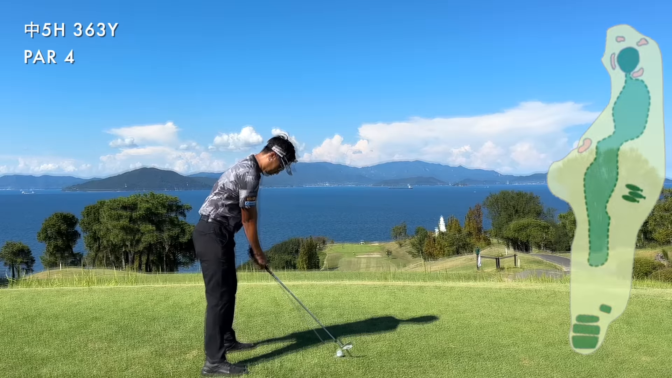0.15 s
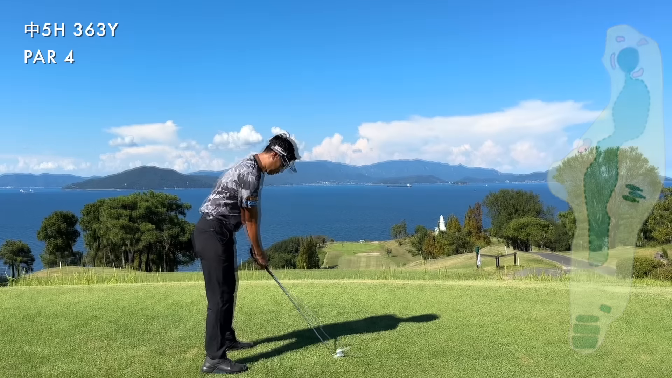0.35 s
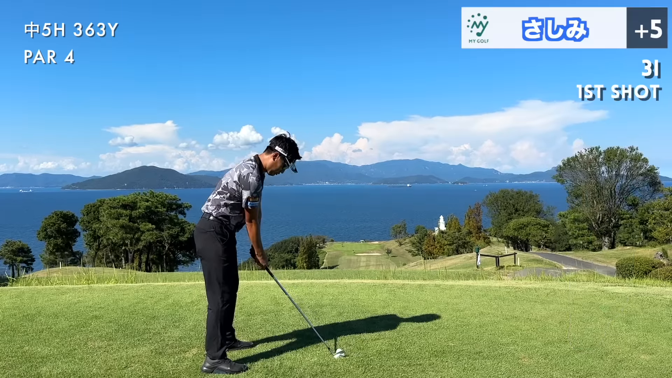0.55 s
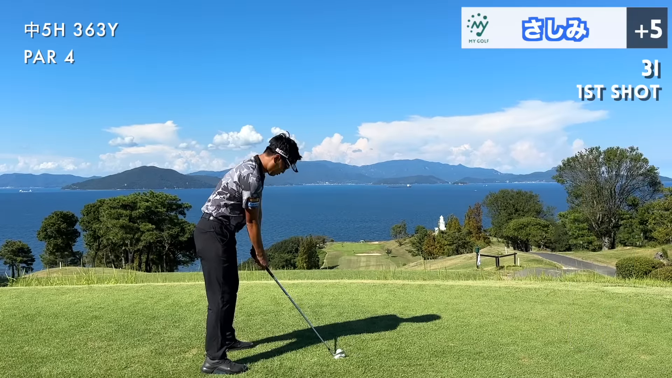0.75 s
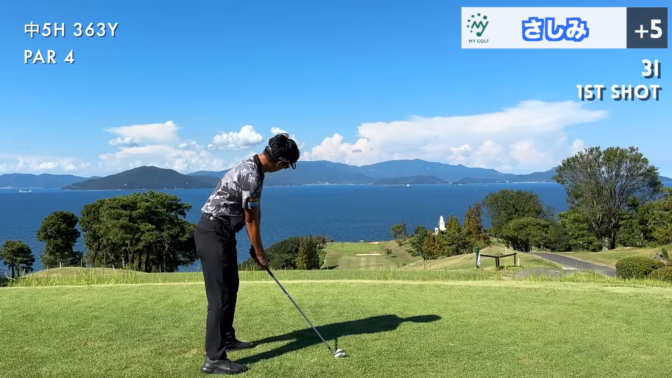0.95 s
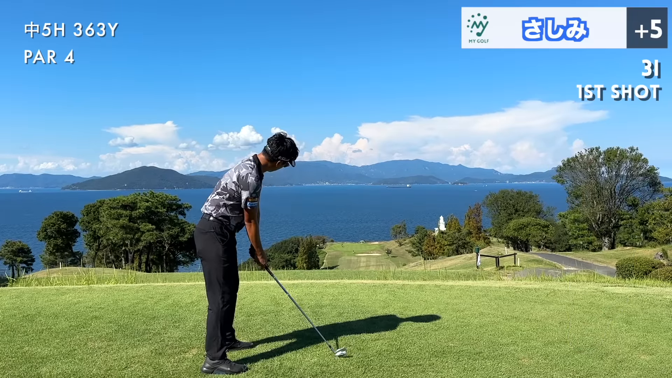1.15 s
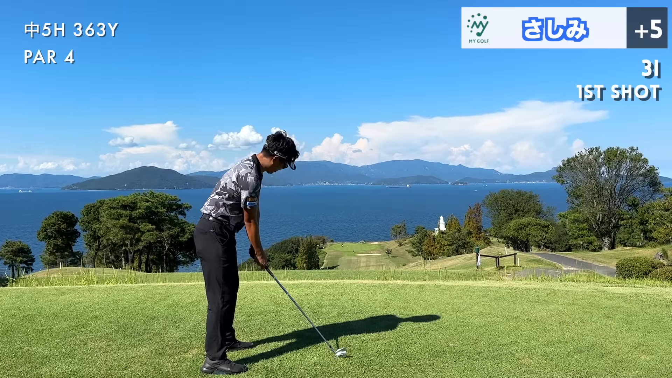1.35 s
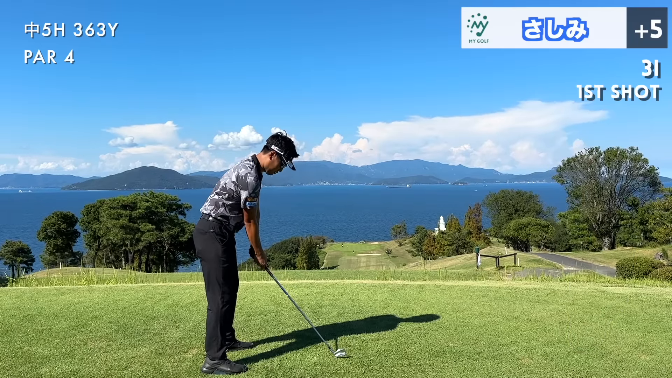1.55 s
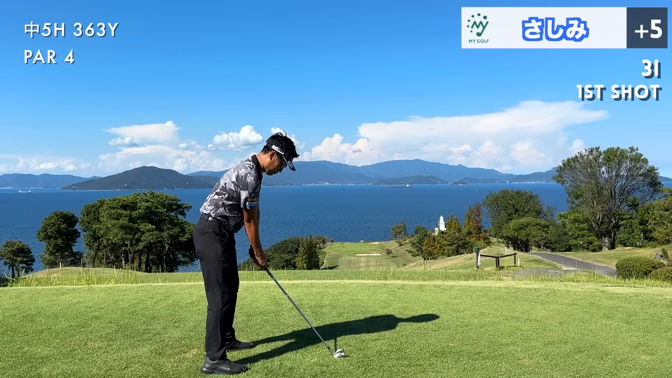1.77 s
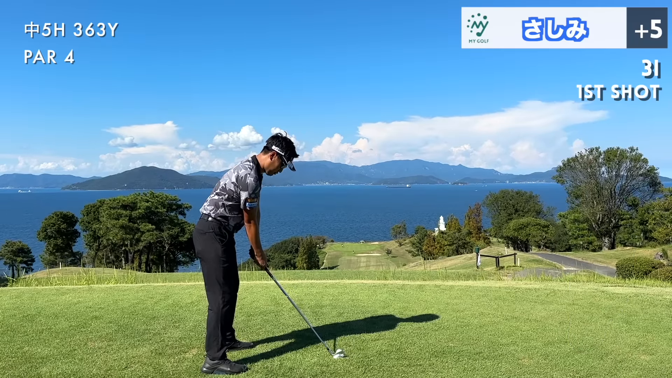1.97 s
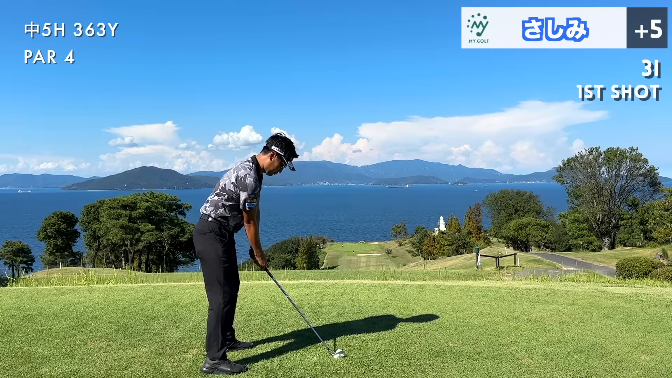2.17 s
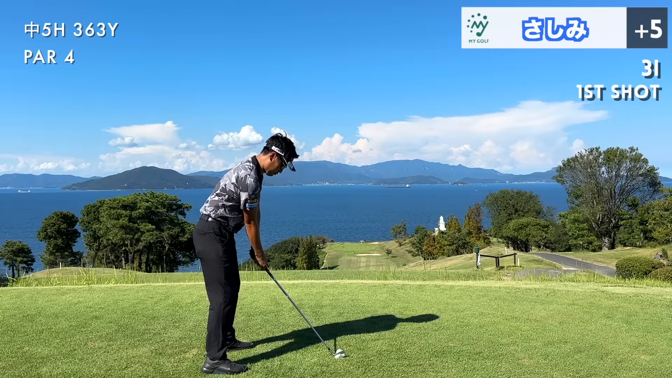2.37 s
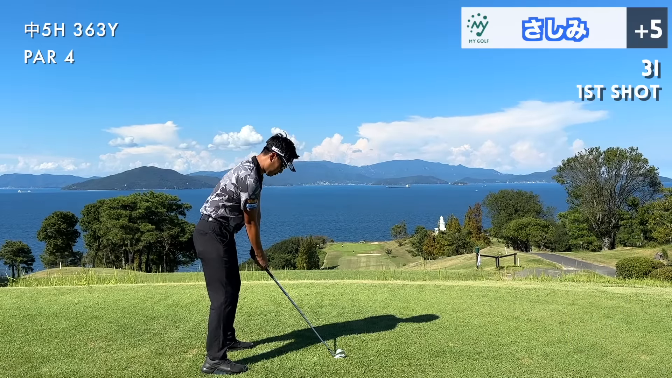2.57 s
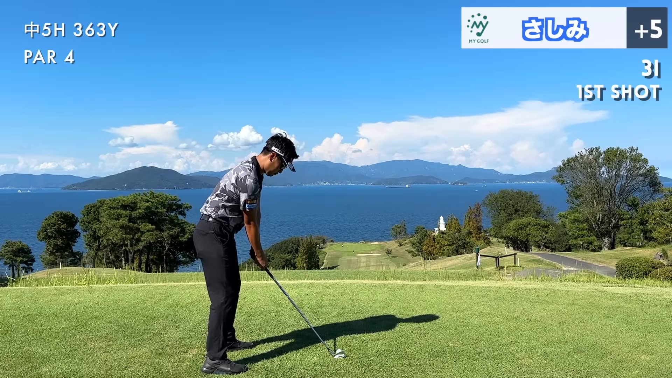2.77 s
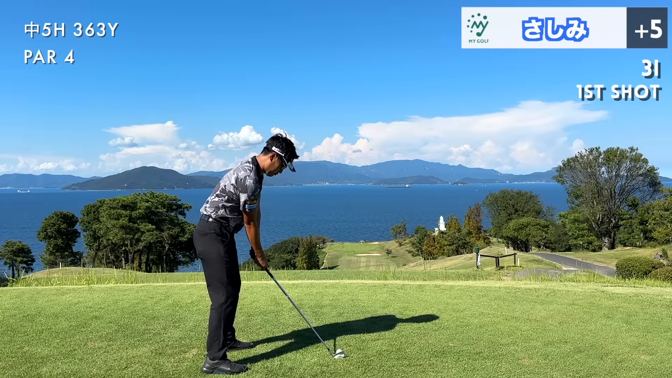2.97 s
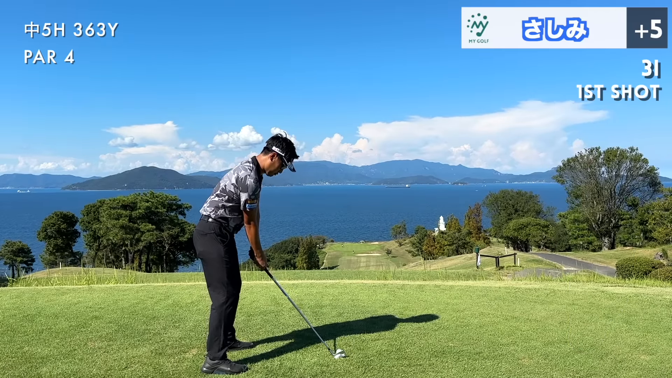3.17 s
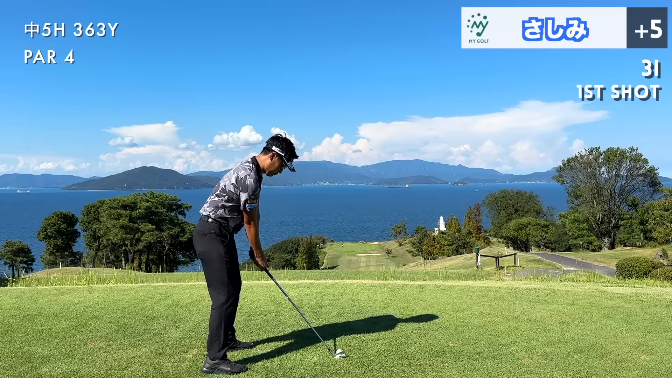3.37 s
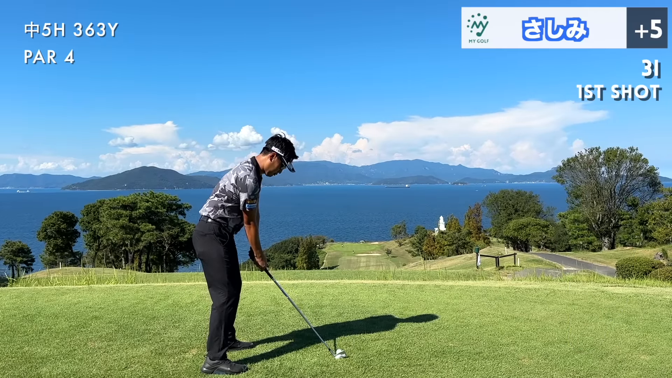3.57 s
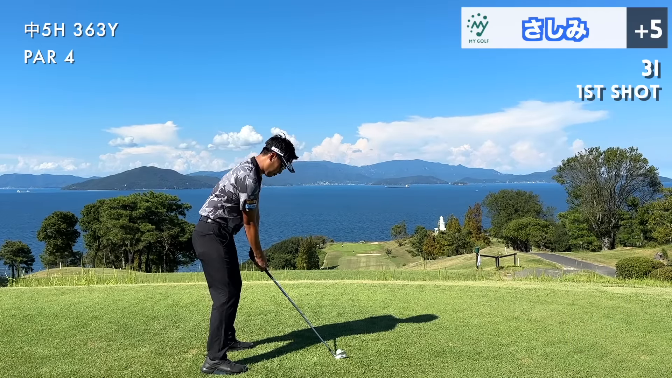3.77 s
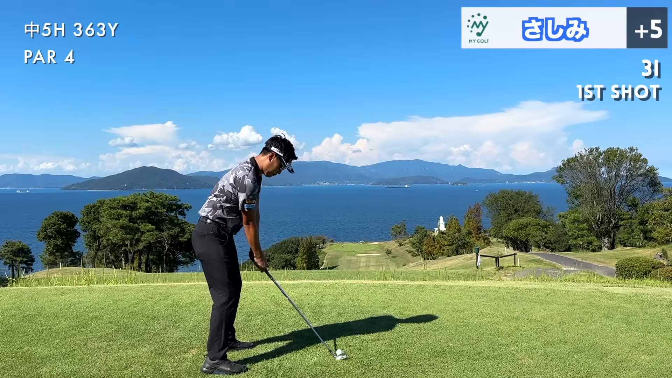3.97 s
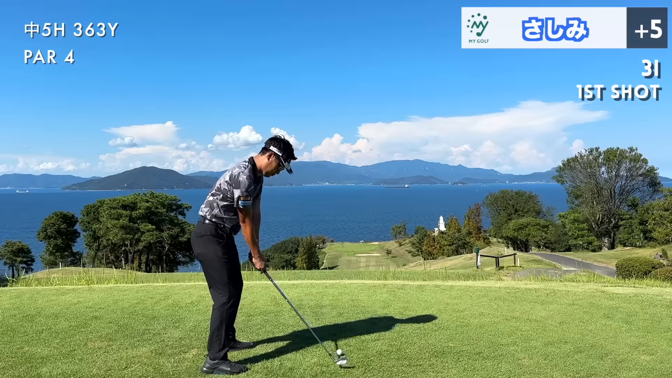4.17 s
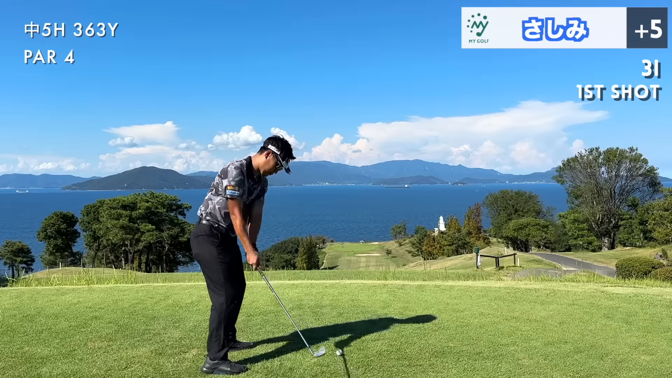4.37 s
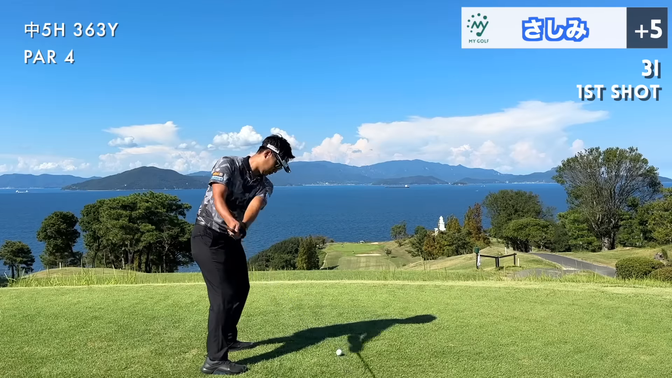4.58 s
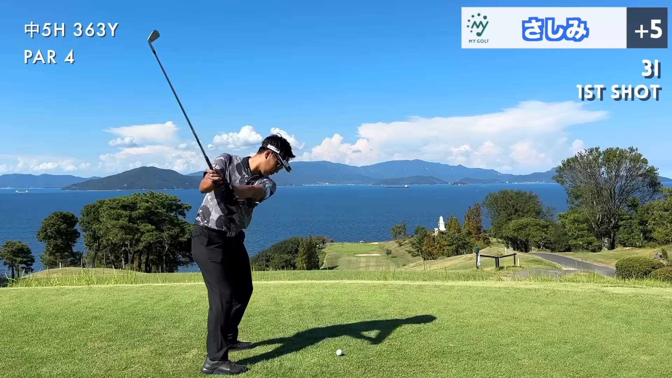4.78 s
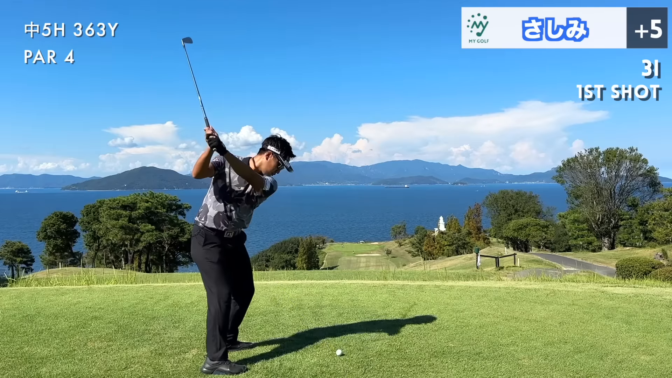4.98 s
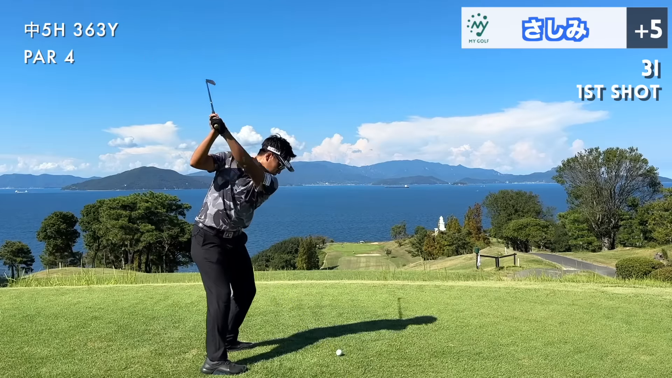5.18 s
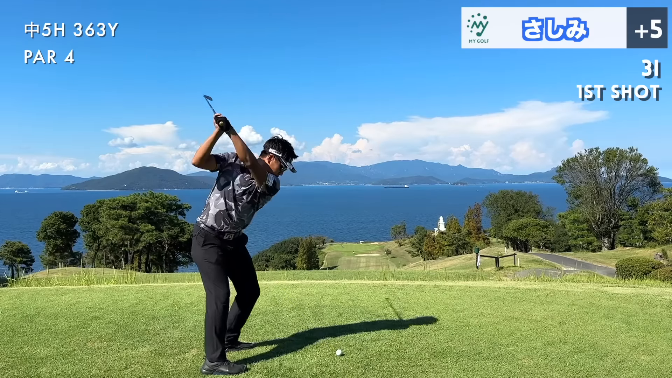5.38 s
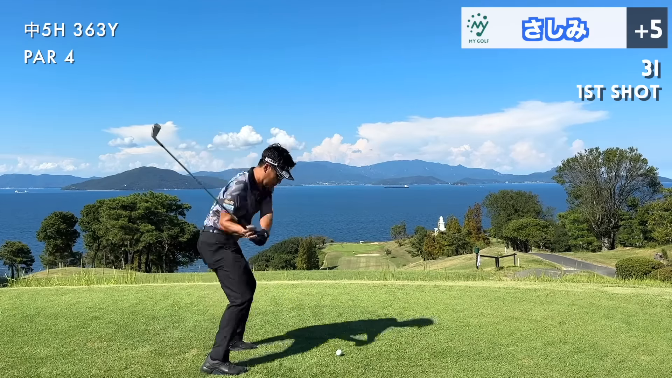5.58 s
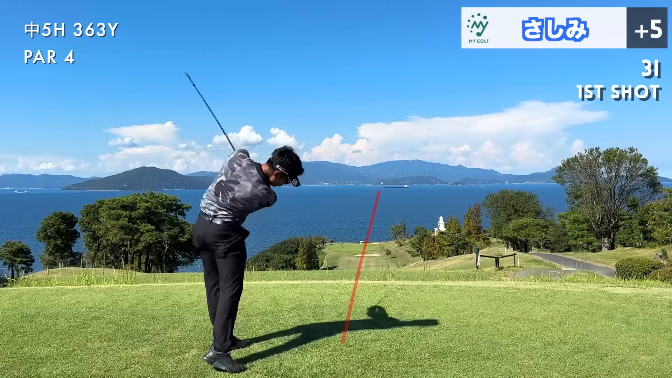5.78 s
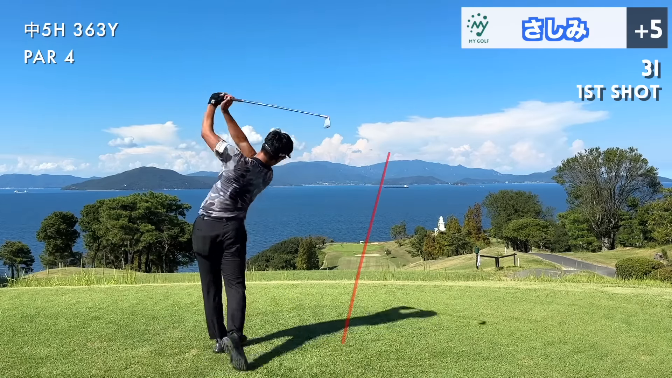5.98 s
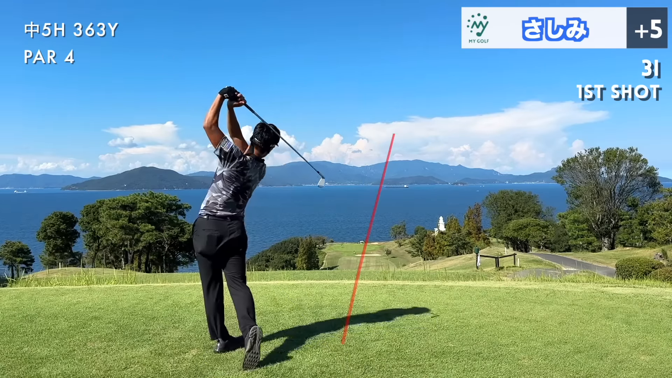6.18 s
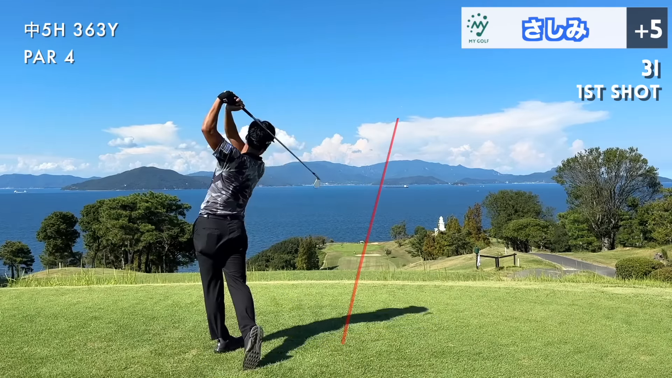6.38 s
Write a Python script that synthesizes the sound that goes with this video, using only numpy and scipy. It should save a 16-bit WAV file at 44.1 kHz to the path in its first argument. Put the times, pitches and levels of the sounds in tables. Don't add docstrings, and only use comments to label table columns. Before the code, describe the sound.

For the first four seconds an open seaside tee is quiet except for wind pushing unevenly on the microphone: deep rumble, flutters, short lulls and dull slaps, notably near 1.4 and 1.8 s. Behind it lies a soft steady hiss of sea and leaves with a barely audible motor hum. A cricket gives faint, high, short chirps about every 0.3 s from 0.5 to 4.9 s. Tiny ticks occur, a brighter one at 3.9 s. From about 4.4 s clothing rustles lightly with the backswing, then surges near 5.5 s. A narrow airy whistle sweeps upward from 5.6 s into a very loud, dry, slightly clipped crack of iron on ball at 5.7 s, gone within hundredths of a second. A tiny tee rattle follows immediately, then soft cloth and shoe scuffs around 5.9 s and beyond, under continuing gusts until 6.4 s.

```python
import sys
import numpy as np
from scipy import signal
from scipy.io import wavfile

SR = 44100
rng = np.random.default_rng(int(sys.argv[2]) if len(sys.argv) > 2 else 0)


def to_linear_factor(level_db):
    exponent = np.asarray(level_db, float) / 20
    return 10 ** exponent


def transcribe(u):
    v = np.clip(np.atleast_2d(u).T, -1, 1)
    q = np.round(v * 32767).astype(np.int16)
    wavfile.write(sys.argv[1], SR, q)


N = 283783


def rms_one(x):
    return x / np.sqrt(np.mean(x ** 2) + 1e-20)


def in_time(rows, outside=-120.):
    s, *columns = np.transpose(rows)
    return [np.interp(np.arange(N) / SR, s, column, outside, outside) for column in columns]


def at_hz(points, hz):
    points_hz, points_db = np.transpose(points)
    return np.interp(np.log(hz), np.log(points_hz), points_db)


def drift(rate):
    r = np.exp(-80 * np.pi * rate / SR)
    slow = signal.lfilter([1], [1, -2 * r, r * r], rng.standard_normal(N // 40 + 2002))[2000:]
    return np.interp(np.arange(N) / 40, np.arange(len(slow)), rms_one(slow))


def ring(x, hz, t60):
    r, w = to_linear_factor(-60 / (t60 * SR)), 2 * np.pi * hz / SR
    return signal.lfilter([0, np.sin(w)], [1, -2 * r * np.cos(w), r * r], x + 1e-18)


def band_pass(x, low_hz, high_hz):
    return signal.sosfilt(signal.butter(2, [low_hz, high_hz], "band", fs=SR, output="sos"), x)


def bands(spectrum, source):
    lowest, highest = spectrum[0][0], spectrum[-1][0]
    edges = lowest * 2 ** np.arange(0, np.log2(highest / lowest) + .5, .5)
    edges = np.minimum(edges, 19000)
    hz = np.sqrt(edges[1:] * edges[:-1])
    parts = []
    for k, centre in enumerate(hz):
        band = band_pass(source[k % 2], edges[k], edges[k + 1])
        parts.append(to_linear_factor(at_hz(spectrum, centre)) * band)
    return zip(hz, np.array(parts) / np.std(sum(parts)))


def swell(curves_db, centres_hz, hz):
    place = np.interp(np.log(hz), np.log(centres_hz), np.arange(len(centres_hz)))
    low = min(int(place), len(centres_hz) - 2)
    return curves_db[low] + (place - low) * (curves_db[low + 1] - curves_db[low])


def air():
    # (frequency [Hz], level [dB/Hz])
    hiss_spectrum = [(180, -34), (300, -3), (978, 4.5), (1080, -0.5), (1460, -3), (1610, -5.5),
                     (5700, -17.5), (7080, -16.5), (7690, -16.5), (16000, -19.5)]
    # (frequency [Hz], width [Hz], level [dB])
    motor_lines = [
        (123, 8, -58),
        (1500, 30, -87),
    ]
    # (time [s], length [s], frequency [Hz], level [dB])
    far_insects = [
        (.6, .3, 11500, -89),
        (.18, .13, 4600, -85),
        (.1, .24, 1500, -74),
        (5.3, .3, 1500, -68),
        (3.8, 1.0, 1500, -83),
    ]
    hiss = to_linear_factor(-70.5) * sum(band * to_linear_factor(.6 * drift(3))
                            for hz, band in bands(hiss_spectrum, rng.standard_normal((2, N))))
    for hz, width_hz, db in motor_lines:
        line = rms_one(ring(rng.standard_normal(N), hz, 2.5 / width_hz))
        hiss += to_linear_factor(db + 5.1 * drift(3.7)) * line
    white = rng.standard_normal(N)
    for s, length, hz, db in far_insects:
        shape = np.exp(-((np.arange(N) / SR - s) / (.5 * length)) ** 4)
        hiss += to_linear_factor(db) * shape * rms_one(ring(white, hz, 420.0 / hz))
    return hiss


def wind(level_db=-37, lumpy_db=1.5, reach_octaves=1.5):
    # (time [s], level [dB])
    gusts = [(0.0, -1.5), (0.56, -7.5), (0.64, 0.5), (0.7, -2), (1.84, 5.5), (2.0, -3.5), (2.46, 9.5),
             (2.8, -15), (3.18, 10), (3.66, -2.6), (4.14, 3.4), (4.28, 6.5), (4.52, -21.5), (4.68, -1.2),
             (5.24, 4), (6.04, -0.9), (6.1, -18), (6.43, 0.8)]
    gust_hz, gust_follow = (50, 200, 520), (.6, 1.0, 1)
    # (frequency [Hz], level [dB/Hz])
    buffet = [(8.8, -22), (15, 5), (54, 1.5), (93, -4.5), (136, -8.5), (168, -11), (276, -19.5),
              (609, -36.5), (677, -45.5), (2500, -82), (3250, -92), (5500, -120)]
    # (time [s], half length [s], swell [dB], pitch [Hz])
    passing_eddies = [(0.2, 0.13, -8.5, 30.3), (0.422, 0.03, -7, 30), (0.8, 0.08, 6.5, 30),
                      (1.095, 0.08, -7, 480), (1.293, 0.08, 5.5, 119), (1.599, 0.03, 10, 29.7),
                      (2.055, 0.05, -11, 480), (2.23, 0.05, 10, 480), (2.452, 0.05, -14, 30),
                      (3.397, 0.08, 3.5, 480), (3.435, 0.05, 9, 59.7), (3.69, 0.08, -2.5, 480),
                      (3.922, 0.05, 8.5, 60), (4.07, 0.08, -5.4, 58.4), (4.53, 0.05, 18, 480),
                      (4.87, 0.03, 6.5, 118), (5.053, 0.05, -12, 238), (5.235, 0.13, 3, 120),
                      (5.397, 0.05, -14, 243), (5.555, 0.05, 11.1, 238), (5.763, 0.05, -16, 120),
                      (5.881, 0.05, 12, 240), (6.289, 0.05, 14, 29.3), (6.3, 0.05, 7.5, 240),
                      (6.41, 0.05, -6.5, 30), (6.415, 0.03, -16, 240),
                      (0.075, .03, 7.5, 480),
        (1.443, 0.029, 4, 240),
        (1.83, 0.025, 3.5, 700),
        (2.62, .03, 7, 300),
        (4.672, 0.025, 10, 350),
        (5.145, 0.057, 5, 402),
        (5.313, 0.037, 3.5, 199),
        (5.69, .035, -10, 250.2),
    ]
    t, (gust_db,) = np.arange(N) / SR, in_time(gusts, outside=0)
    s, half, db, pitch = np.transpose(passing_eddies)[:, :, None]
    coarse_t = t[::64]
    eddies = db * np.exp(-((coarse_t - s) / half) ** 2)
    lurch, out = drift(25), 0
    for hz, band in bands(buffet, rng.standard_normal((2, N))):
        nearness = np.exp(-(np.log2(hz / pitch) / reach_octaves) ** 2)
        passing_db = np.interp(t, coarse_t, np.sum(eddies * nearness, axis=0))
        follow_db = swell(gust_follow, gust_hz, hz) * gust_db
        lurch_db = lumpy_db * min(hz / 250, 1) * lurch
        out = out + band * to_linear_factor(level_db + follow_db + passing_db + lurch_db)
    return out


def thumps(hz=200, length=0.0075, gain_db=6):
    # (time [s], peak level [dB])
    slaps = [
        (1.354, -36.5),
        (1.468, -42),
        (1.812, -31),
        (2.219, -42.5),
        (3.39, -39),
        (3.431, -37.5),
        (4.184, -44),
        (4.863, -35.5),
        (6.284, -37.5),
    ]
    t = np.arange(N) / SR
    shape = sum(to_linear_factor(db) * np.exp(-((t - s - length) / length) ** 2) for s, db in slaps)
    dull = signal.sosfilt(signal.butter(3, hz, fs=SR, output="sos"), rng.standard_normal(N))
    return to_linear_factor(gain_db) * shape * rms_one(dull)


def chirp_events(chirp_hz=7086, spread_db=0.5, spread_s=.008, spread_hz=50):
    # (time [s], peak level [dB])
    chirps = [(0.4738, -65.5), (0.7502, -63.5), (1.0266, -64.5), (1.3069, -64), (1.5893, -65),
              (1.8746, -63.5), (2.1645, -64), (2.4563, -63.5), (2.7501, -62.5), (3.0455, -61.5),
              (3.3453, -67), (3.6411, -64.5), (3.9449, -64.5), (4.2457, -62.5), (4.5594, -73),
              (4.8589, -66)]
    # (delay [s], level relative to -63 dB [dB], pitch [Hz], first chirp, last chirp)
    answers = [
        (-.125, -19, 6850, 0, 10),
        (.055, -15, 7040, 7, 13),
        (-.05, -20, 7000, 0, 6),
    ]
    rows = [(s, db, chirp_hz) for s, db in chirps]
    for delay, under_db, hz, first, last in answers:
        chance = rng.standard_normal((len(chirps), 3)) * [spread_s, spread_db, spread_hz]
        for k in range(first, last + 1):
            rows.append(np.add((chirps[k][0] + delay, -63 + under_db, hz), chance[k]))
    return rows


def cricket(length=.028, fall_hz=330, overtone_db=-18, echo_db=-13, lead=.008, chorus_db=-94):
    out, t = np.zeros(N), np.arange(int(length * SR)) / SR
    shape = np.sin(np.pi * (t / length) ** 0.89) ** 2
    for s, db, hz in chirp_events():
        turn = 2 * np.pi * np.cumsum(hz + fall_hz * (.5 - t / length)) / SR
        tone = np.sin(turn) + to_linear_factor(overtone_db) * np.sin(2 * turn)
        at = int((s - lead) * SR)
        out[at:at + len(t)] += to_linear_factor(db) * shape * tone
    out *= 1 + 0.29 * drift(150)
    scatter = rng.standard_normal(2000) * to_linear_factor(-60 * np.arange(2000) / SR / 0.036)
    blurred = signal.fftconvolve(out, scatter / np.linalg.norm(scatter))[:N]
    echo = np.roll(blurred, int(.015 * SR))
    chorus = rms_one(ring(rng.standard_normal(N), 6870, 0.01)) * to_linear_factor(3.9 * drift(25))
    chorus *= np.arange(N) < 4.4 * SR
    return out + to_linear_factor(echo_db) * echo + to_linear_factor(chorus_db) * chorus


def ticks():
    # (time [s], peak level [dB], pitch [Hz], dry click [dB], bright ring [dB])
    tick_events = [
        (.286, -56.5, 1300, 16, -6),
        (1.47, -52, 1290, -6, -20),
        (3.882, -46, 3700, -14, -13),
        (3.893, -55, 2400, -8, -2),
        (5.653, -30, 2850, -45, -30),
        (5.828, -54, 2000, -6, -10),
        (6.003, -54, 2240, -10.5, -23),
        (5.4, -60, 3020, 0, -10),
    ]
    out, click = np.zeros(N), np.eye(1, 800)[0]
    bright = ring(click, 8100, 0.0031) + ring(click, 5600, .003)
    for s, db, hz, dry_db, bright_db in tick_events:
        at = int(s * SR)
        tick = ring(click, hz, 14.0 / hz) + to_linear_factor(bright_db) * bright + to_linear_factor(dry_db) * click
        out[at:at + len(click)] += to_linear_factor(db) * tick
    return out


def cloth(grain_db=3.0):
    # (time [s], level [dB], dullness [dB])
    movements = [
        [(0.1, -88, 10), (0.146, -78.5, -11), (0.28, -81, 3)],
        [(0.78, -97, 4), (0.866, -82, 4), (0.98, -97, 4)],
        [(4.35, -82, 8), (4.5, -76.5, 2), (4.6, -71.5, 3), (4.64, -71.5, 1.5), (4.78, -72.5, 4),
         (4.95, -69, -2), (5.12, -70, 0), (5.39, -69.5, 4.5), (5.44, -66, 2)],
        [(5.44, -66, 5), (5.486, -58.5, 5), (5.5, -49.5, 9.5), (5.528, -44.5, 10), (5.568, -52.5, 3.5),
         (5.592, -59.5, 1.5), (5.638, -62.5, 0.5), (5.675, -60.5, 6.5)],
        [(5.695, -58.5, 4), (5.725, -64.5, 3), (5.744, -68, 4), (5.85, -76, -6), (5.876, -69, 4.5),
         (6.01, -78, -3.5), (6.238, -82.5, 0), (6.435, -79, -1)],
    ]
    region_hz, base_db, tilt = (1400, 3600, 8000, 13500), (7.7, 7.9, 7, 6), (1.01, -0.092, -.6, -0.32)
    # (frequency [Hz], level [dB/Hz])
    cloth_spectrum = [(350, -29), (600, -2.5), (869, -6.5), (1550, -4), (1640, -7.5), (2830, -10),
                      (8740, -14.5), (12800, -14.5), (16000, -44)]
    # (time [s], level [dB], length [s])
    scuffs = [(4.603, -69, .03), (5.57, -46.5, 0.011), (0.058, -69, 0.03), (5.8, -72, 0.021),
              (5.873, -60, .02), (5.913, -55.5, 0.014), (5.948, -71.5, .02), (6.041, -65, 0.024),
              (6.11, -68, 0.023), (6.192, -67.5, 0.027), (6.343, -69, .01)]
    rush = [
        (5.672, -52, .03),
        (5.682, -52, .012),
        (5.705, -64, .02),
    ]
    t = np.arange(N) / SR
    curves = [in_time(rows, outside=0) for rows in movements]
    level_db, dull_db = np.transpose(curves, (1, 0, 2)).sum(axis=1)
    level_db = np.where(level_db < 0, level_db, -120)
    regions = level_db + np.outer(tilt, dull_db) + np.array(base_db)[:, None]
    bursts = sum(to_linear_factor(db) * np.exp(-((t - s) / (.5 * length)) ** 2) for s, db, length in scuffs + rush)
    slips = np.minimum(rng.exponential(1, (2, N)), 5)
    grains = rng.standard_normal((2, N)) * to_linear_factor(grain_db * slips)
    out = 0
    for hz, band in bands(cloth_spectrum, grains):
        burst_gain = to_linear_factor(swell([-1.5, -1.5, -7.5, 1.5], region_hz, hz))
        out = out + band * (to_linear_factor(swell(regions, region_hz, hz)) + bursts * burst_gain)
    return to_linear_factor(.8 * drift(90)) * out


def stretch():
    # (time [s], half length [s], level [dB], low edge [Hz], high edge [Hz])
    stretches = [
        (5.12, 0.27, -71, 6500, 11000),
        (5.49, .02, -49, 1100, 1600),
        (5.525, 0.027, -46, 1200, 3800),
        (5.665, .015, -54, 1500, 4000),
        (5.715, .02, -54, 1400, 3200),
    ]
    t, white = np.arange(N) / SR, rng.standard_normal(N)
    out = np.zeros(N)
    for s, half, db, low_hz, high_hz in stretches:
        shape = np.exp(-((t - s) / half) ** 2)
        out += to_linear_factor(db) * shape * rms_one(band_pass(white, low_hz, high_hz))
    return out


def shaft(width_hz=150, breadth_db=-7):
    # (time [s], pitch [Hz], level [dB])
    whistle = [(5.57, 295, -64), (5.63, 430, -44), (5.648, 520, -36), (5.654, 570, -42), (5.662, 630, -29),
               (5.673, 700, -35), (5.683, 730, -24), (5.692, 640, -35), (5.705, 500, -60)]
    hz, db = in_time(whistle)
    carrier = np.exp(2j * np.pi * np.cumsum(hz) / SR)
    narrow = 1 + .4 * drift(width_hz) + .5j * drift(width_hz)
    broad = drift(500) + 1j * drift(500)
    return to_linear_factor(db) * np.real(carrier * (narrow + to_linear_factor(breadth_db) * broad))


def tee(rattle_s=.0012):
    # (time [s], peak level [dB])
    skips = [
        (5.7158, -43.5),
        (5.7198, -50.5),
        (5.7236, -44.5),
    ]
    # (frequency [Hz], level [dB], t60 [s])
    peg_modes = [
        (9500, 2, .005),
        (6800, -3.5, .004),
        (13500, -5, .003),
        (3000, -10.5, .005),
    ]
    t, rattle = np.arange(N) / SR, np.zeros(N)
    for s, db in skips:
        rattle += to_linear_factor(db - 7.5) * np.exp(-np.maximum(t - s, 0) / rattle_s) * (t >= s)
    rattle *= rng.standard_normal(N)
    return sum(to_linear_factor(db) * ring(rattle, hz, t60) for hz, db, t60 in peg_modes)


def blow(blow_s=5.68655, contact_s=.0006, swell_s=.0012, ground_s=.0020):
    # (frequency [Hz], level [dB], t60 [s])
    club_modes = [(2450, -19, .016), (560, -22, .012), (1200, -20, .012), (1650, -11, .011),
                  (3200, -12, .010), (3850, -7, .010), (4500, -10, .010), (5300, -12, .009),
                  (12400, -8, .006), (6600, -12, .007), (7200, -13, .007), (8700, -12, .007),
                  (10300, -14, .006), (13900, -14, .004)]
    # (delay [s], level [dB], t60 [s])
    cracks = [
        (.0003, -13, .010),
        (.0020, -11, .007),
        (.004, -27, .02),
        (.01, -58, .15),
    ]
    # (frequency [Hz], level [dB/Hz])
    crack_spectrum = [(470, -53), (800, -10.5), (1900, 3.5), (2770, -2.5), (3340, 0), (5310, 7.5),
                      (5940, -10), (8990, -2), (16000, -39.5)]
    out, at, t = np.zeros(N), int(blow_s * SR), np.arange(SR // 4) / SR
    touch = to_linear_factor(-11) * np.sin(np.pi * np.clip(t / contact_s, 0, 1))
    rise = t / swell_s
    squash = -to_linear_factor(4) * (rise * np.exp(1 - rise)) ** 9 * np.cos(2 * np.pi * 2480 * t)
    ground_delay = int(ground_s * SR)
    echo = to_linear_factor(-17) * np.roll(squash, ground_delay)
    click = np.eye(1, len(t), ground_delay)[0]
    body = 0
    for k, (hz, db, t60) in enumerate(club_modes):
        body = body + to_linear_factor(db) * (-1) ** k * ring(click, hz, t60)
    bursts = 0
    for delay, db, t60 in cracks:
        bursts = bursts + to_linear_factor(db - 60 * np.maximum(t - delay, 0) / t60) * (t > delay)
    noise = sum(band for hz, band in bands(crack_spectrum, rng.standard_normal((2, len(t)))))
    out[at:at + len(t)] = touch + squash + echo + body + bursts * noise
    return out


def scene():
    background = air() + wind() + thumps() + cricket() + ticks()
    swing = cloth() + stretch() + shaft()
    return (background + swing + tee() + blow())[None]


def band_limit(x):
    return signal.sosfilt(signal.butter(12, 16330, fs=SR, output="sos"), x)


def record(dry):
    ceiling = .9
    held = ceiling * np.tanh((np.abs(dry) / ceiling) ** 3) ** (1 / 3) * np.sign(dry)
    held = signal.sosfilt(signal.cheby2(10, 24, 16150, fs=SR, output="sos"), held)
    return band_limit(held)


dry = scene()
out = record(dry)
transcribe(out)
```